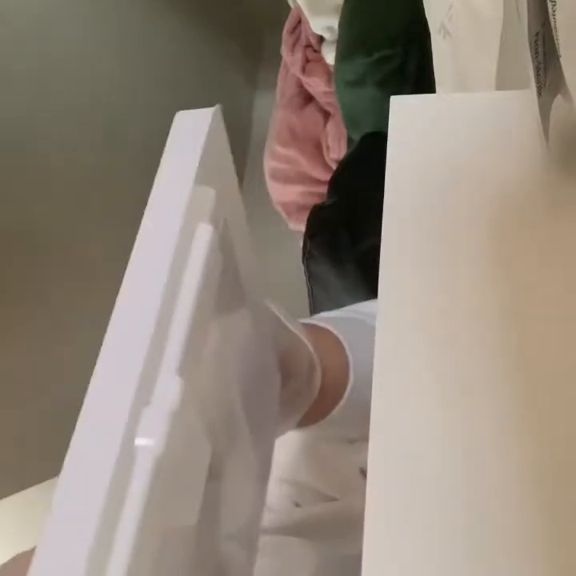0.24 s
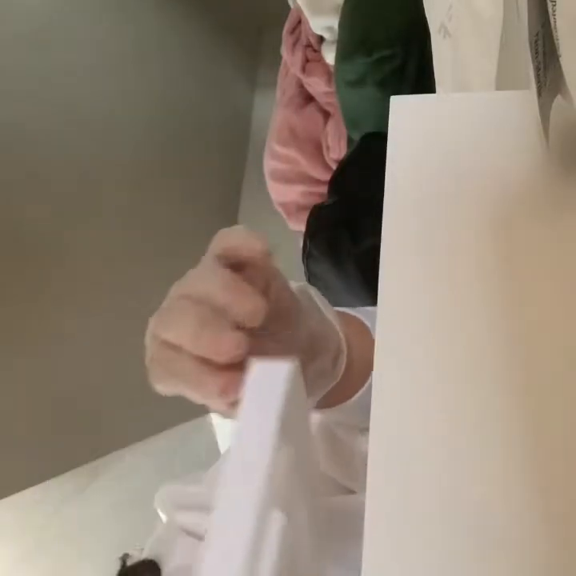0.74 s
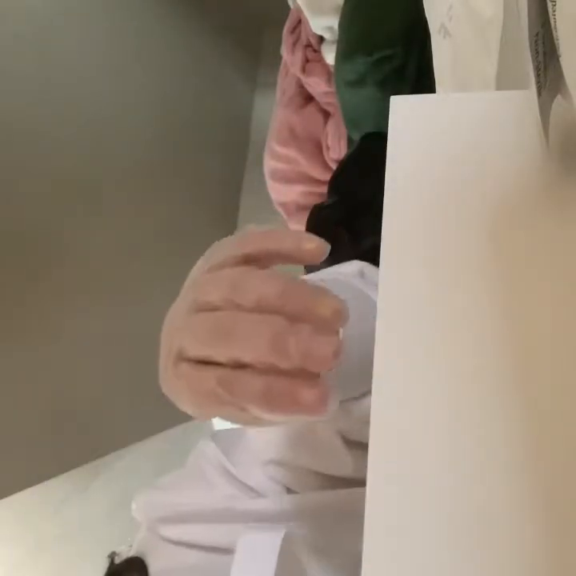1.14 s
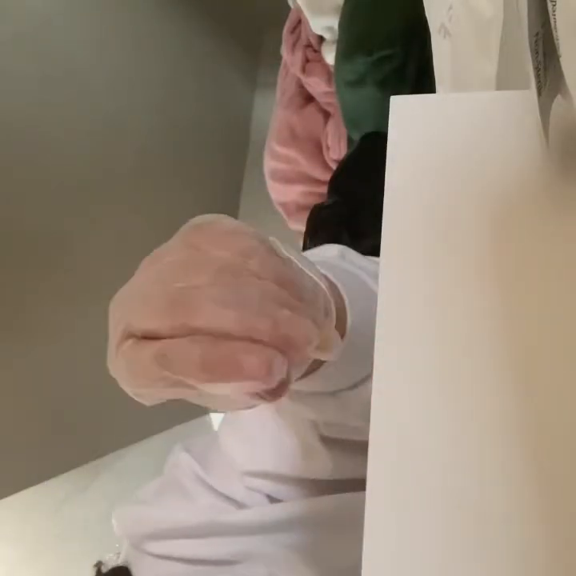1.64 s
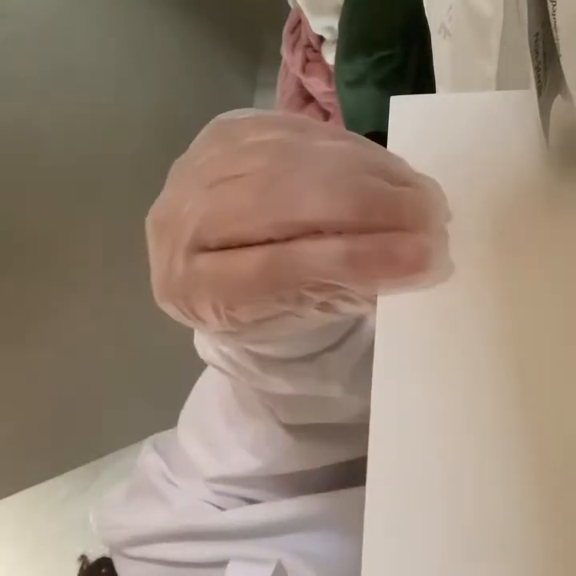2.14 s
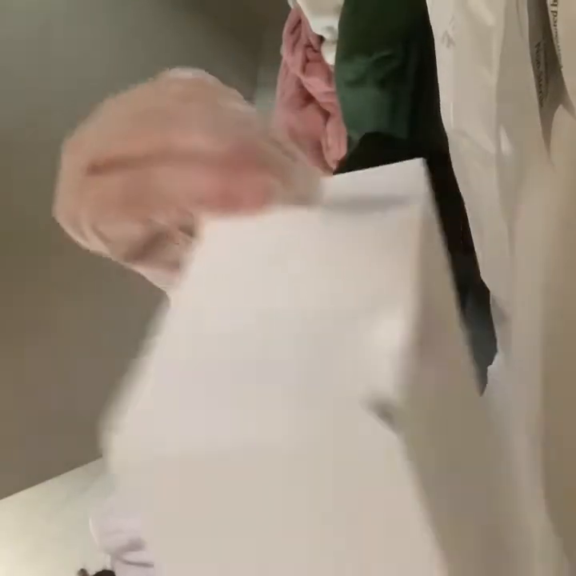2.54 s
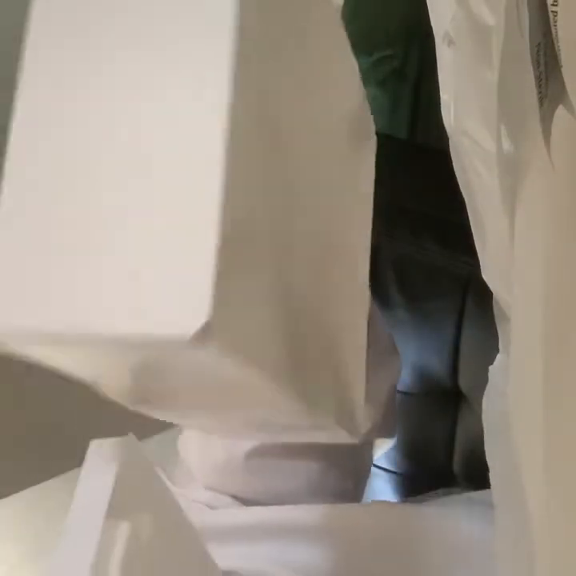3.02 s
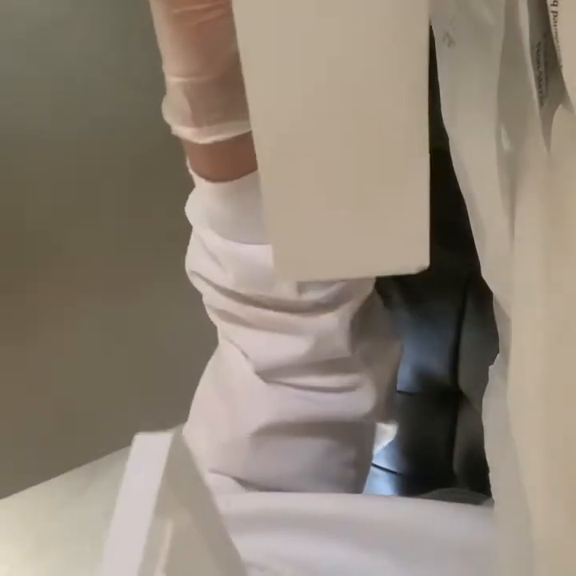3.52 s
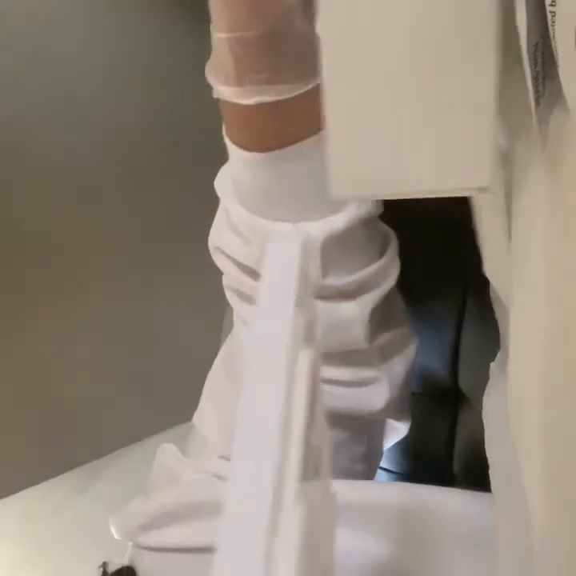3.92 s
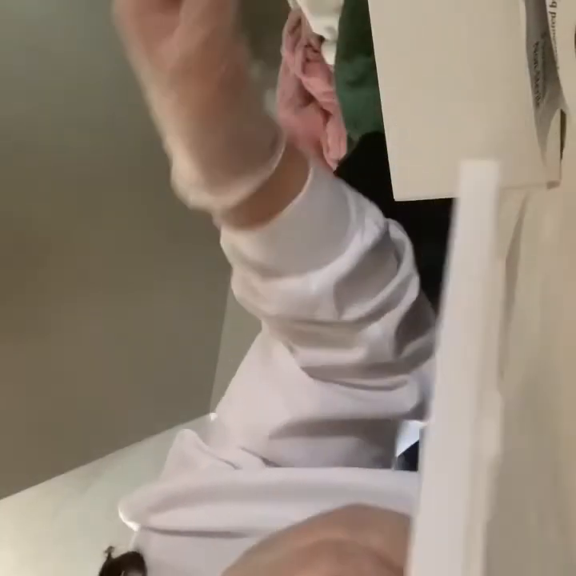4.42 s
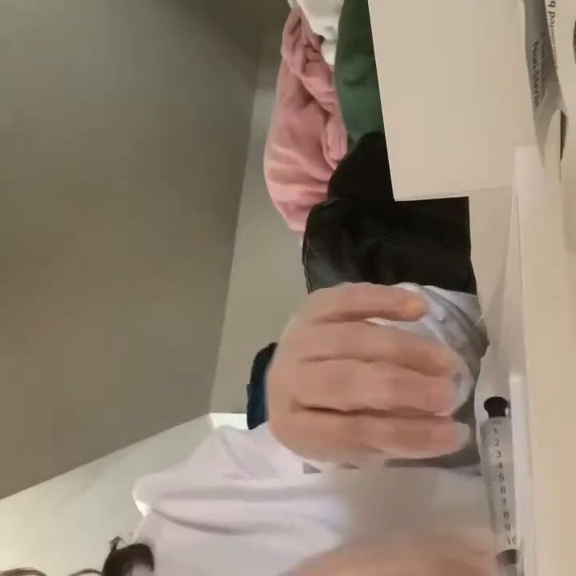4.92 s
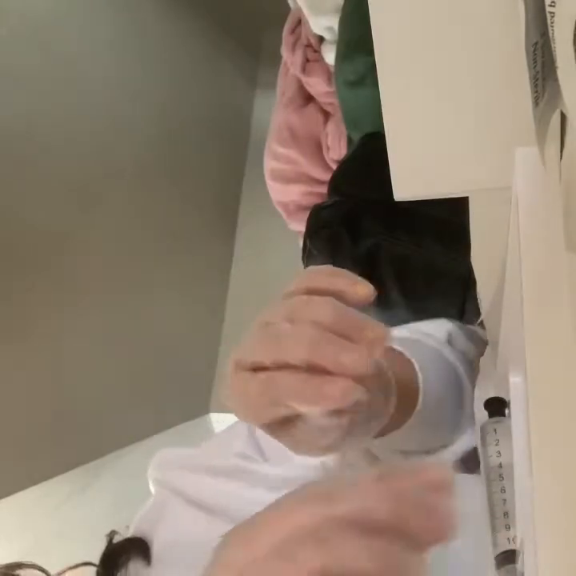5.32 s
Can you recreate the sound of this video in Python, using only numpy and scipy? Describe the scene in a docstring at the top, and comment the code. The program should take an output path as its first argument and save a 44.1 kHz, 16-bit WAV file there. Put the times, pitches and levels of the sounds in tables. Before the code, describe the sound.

Close by in a small room, card rasps along plastic and pops loose, then the tray is set down with clicks above ventilation hum.

```python
"""One hears a cardboard box pulled off a thin plastic tray, close by in a small room, over a steady ventilation hum.
Stick-slip friction drags, catches and slips the card along the tray's rim, ringing box and tray until a click.
Sleeve and glove stroke the tray by dense micro-slips; soft pushes ring the box's panel modes.
Short contact bursts make the clicks of the tray being set down; the fan is wavering tones over filtered noise."""
import sys
import numpy as np
from scipy import signal
from scipy.fft import rfft, irfft, next_fast_len
from scipy.io import wavfile

SR = 44100
rng = np.random.default_rng(int(sys.argv[2]) if len(sys.argv) > 2 else 0)


def master_out(mix):
    """Clip the mix to full scale and print it as 16-bit PCM to the path in sys.argv[1]."""
    frames = np.transpose(np.atleast_2d(mix))
    ceiling = np.clip(frames, -1, 1)
    pcm = np.round(ceiling * 32767).astype(np.int16)
    wavfile.write(sys.argv[1], SR, pcm)


N = 245469
TIME = np.arange(N) / SR
SIZE = next_fast_len(N)
HZ = np.maximum(np.arange(SIZE // 2 + 1) * SR / SIZE, 1)


def undb(db):
    """Level to amplitude: 20 dB is a factor of ten."""
    return 10 ** (np.asarray(db) / 20)


def unit(x):
    """Normalization to an rms of 1."""
    return x / np.sqrt(np.mean(x ** 2))


def over_hz(points):
    """Interpolation of (Hz, value) points on a logarithmic frequency axis."""
    hz, value = np.transpose(points)
    return np.interp(np.log(HZ), np.log(hz), value)


def response(points, peaks=()):
    """Minimum-phase filter of unit power: a smooth spectrum in dB, lifted by resonances."""
    db = over_hz(points)
    for hz, width, lift in peaks:
        db = db + lift / (1 + (2 * (HZ - hz) / width) ** 2)
    # folding the cepstrum onto positive times makes the filter causal
    cepstrum = irfft(np.log(unit(undb(db))), SIZE)
    cepstrum[1:SIZE // 2] *= 2
    cepstrum[SIZE // 2 + 1:] = 0
    return np.exp(rfft(cepstrum))


def through(x, filt):
    """Linear filtering: the spectrum is multiplied by a frequency response."""
    return irfft(rfft(x, SIZE) * filt, SIZE)[..., :N]


def decay_60db(age, t60):
    """Exponential decay: the amplitude falls by 60 dB in t60 seconds."""
    return np.exp(-np.log(1000) * age / t60)


def walk(rate):
    """Low-passed noise: a smooth random wander of rms 1, slower for a lower rate in Hz."""
    return unit(through(rng.standard_normal(N), np.exp(-(HZ / rate) ** 2) + 1e-12))


def friction(rate, spread_db):
    """Dry friction as a random train of micro-slips of unequal size, rms 1; rate in slips per second."""
    caught = rng.random(N) < rate / SR
    sign = rng.choice([-1, 1], N)
    size = undb(spread_db * np.minimum(rng.exponential(size=N), 4))
    return unit(caught * sign * size)


def swell(start, rise, hold, fall):
    """Contact envelope: linear build-up, steady hold, exponential decay; all in seconds."""
    level = np.zeros(N)
    span = slice(int(start * SR), int((start + rise + hold + 20 * fall) * SR))
    age = TIME[span] - start
    build_up = np.clip(age / max(rise, 1e-4), 0, 1)
    level[span] = build_up * np.exp(-np.maximum(age - rise - hold, 0) / max(fall, 1e-4))
    return level


# every contact builds up over a share of its length and dies away over another
RISE_SHARE, FADE_SHARE = 0.49, 0.71


def contact(start, length):
    """Contact time sets abruptness: the longer a touch lasts, the softer it starts and ends."""
    return swell(start, RISE_SHARE * length, (1 - RISE_SHARE) * length, FADE_SHARE * length)


# Level balance of the microphone ports. Each row: frequency in Hz, left minus right in dB.
PORT_BALANCE = [(60, -0.7), (200, -0.8), (400, -2.8), (700, -6), (1300, -6.5), (2400, 1.2), (4000, 0)]
# Diffuse share at the ports. Each row: frequency in Hz, diffuse sound relative to direct in dB.
DIFFUSE_SHARE = [(60, -26), (300, -18), (600, -9), (1200, -6), (2200, -3), (3300, -6), (4500, -24),
                 (5500, -10), (15000, -9)]
# Phase between the ports. Each row: frequency in Hz, lead of the left port in radians.
PORT_LEAD = [(0, 0), (600, -0.5), (1210, 0.3), (2410, -3.3), (2760, -3.0), (5000, -3.2), (7670, -6.1),
             (9560, -6.4), (10200, -7.4), (12000, -9.3), (14200, -9.6), (15000, -11.5), (15200, -11.6),
             (16000, -12.6)]


def ports(direct, diffuse):
    """Interaural-like phase and shading: treble reaches the left port later, the recorder's body shades the middle."""
    spread = undb(over_hz(DIFFUSE_SHARE))
    shade = undb(over_hz(PORT_BALANCE))
    delay = np.exp(1j * np.interp(HZ, *np.transpose(PORT_LEAD)))
    power = (1 + spread ** 2) * (1 + shade ** 2) / 2
    pair = np.array([shade * delay, np.ones_like(HZ)]) / np.sqrt(power)
    opposed = np.array([[1], [-1]])  # the diffuse part has opposite sign at the two ports
    return through(direct, pair) + through(diffuse, pair * spread * opposed)


def reflections(x, t60, dull_hz):
    """Reverberation: a dense echo train from the walls decays exponentially, its treble dulled."""
    tail = rng.standard_normal(N) * decay_60db(TIME, t60) * (TIME > .003)
    return through(x, rfft(tail / np.sqrt(np.sum(tail ** 2)), SIZE) / (1 + 1j * HZ / dull_hz))


# Tones of the fan. Each row: pitch in Hz, mean level in dB, waver as an rms share of the pitch.
FAN_TONES = [(59.5, -59, 0.0031), (212.8, -53, 0.00586), (322.3, -52.5, 0.01026), (402.6, -45.5, .0007),
             (601, -58, 0.00615), (806, -53.5, 0.00208)]
# Spectrum of the air in the duct. Each row: frequency in Hz, relative density in dB per Hz.
DUCT_AIR = [(25, -15), (42, -13), (60, 2), (150, 1.5), (450, 0), (700, 0), (950, -1), (1400, -8),
            (2200, -16), (3200, -18), (5500, -23), (8000, -29.5), (10000, -42), (15000, -56)]
# Resonances and dips of the duct. Each row: frequency in Hz, width in Hz, lift in dB.
DUCT_RESONANCES = [(120, 14.4, 4), (153, 17, -8.5), (193.3, 14, 11.5), (245, 64, -5), (317.4, 81, 10.5),
                   (337.6, 7.5, 3), (368, 16.7, -7), (423, 9.2, -5), (442.5, 17, 4), (476, 15.4, -4.5),
                   (526.6, 8.2, -6.5), (544, 16, 4), (601, 61, 6.5), (652, 58, -9), (1530, 52, -8)]


def ventilation(air_db=-41.0, flutter_db=1.0):
    """Rotating-fan tones, wavering in pitch and level, over turbulent noise shaped by duct resonances."""
    duct = response(DUCT_AIR, DUCT_RESONANCES)
    air, scattered = (undb(air_db) * through(rng.standard_normal(N), duct) for _ in range(2))
    hum = 0
    for hz, db, waver in FAN_TONES:
        phase = 2 * np.pi * np.cumsum(hz * (1 + waver * walk(3.84))) / SR
        hum = hum + undb(db + flutter_db * walk(4.7)) * np.sqrt(2) * np.sin(phase)
    return ports(air + hum, scattered)


# Dull bumps on the box. Each row: start in seconds, level of the push in dB, contact time in seconds.
BOX_BUMPS = [(2.566, -29, 0.0028), (2.851, -17, 0.019), (4.0009, -19.5, 0.0015), (4.095, -21, 0.0059),
             (4.725, -21.5, 0.0053)]
# Panel modes of the box. Each row: frequency in Hz, relative level in dB, time to decay by 60 dB in seconds.
PANEL_MODES = [(85.4, -28, 0.42), (156, -9.5, 0.14), (257, 4.5, 0.11), (375, 0.5, 0.043), (580, -6, 0.11)]


def bumps():
    """Modal excitation of the box's panels by soft pushes; a longer contact leaves only the lowest modes."""
    push = np.zeros(N)
    for s, db, length in BOX_BUMPS:
        pulse = np.sin(np.pi * np.clip((TIME - s) / length, 0, 1))
        push -= undb(db) * pulse / pulse.sum()
    ring = 0
    for hz, db, t60 in PANEL_MODES:
        ring = ring + undb(db) * np.sin(2 * np.pi * hz * TIME) * decay_60db(TIME, t60)
    radiation = (1j * HZ / (55 + 1j * HZ)) ** 3  # a small panel radiates no deep bass
    return through(push, rfft(ring, SIZE) * radiation)


# Strokes of sleeve and glove. Each row: firmest moment, build-up and let-go in seconds, peak pressure in dB.
GLOVE_STROKES = [(1.50, 0.052, 0.26, -65.5), (2.385, 0.36, 0.12, -57), (3.991, 0.32, 0.1, -51),
                 (4.06, 0.042, 0.27, -51.5), (4.715, 0.2, 0.17, -51.5), (5.42, 0.4, 0.42, -70)]
STROKE_CURVE = 1.03  # above 1 the pressure peaks more sharply


def pressure():
    """Normal force: sleeve and glove bear on the plastic in strokes that build up and let go."""
    total = 0
    for s, build, release, db in GLOVE_STROKES:
        stroke = np.interp(TIME, [s - build, s, s + release], [0, 1, 0])
        total = total + undb(db) * stroke ** STROKE_CURVE
    return total + 1e-6


# Spectrum of the lower cloth rustle. Each row: frequency in Hz, relative density in dB per Hz.
CLOTH_RUSTLE = [(200, -26), (700, 1), (1400, 6.5), (2000, 3), (3000, 4.5), (5000, -7), (8000, -9),
                (11000, -5), (16000, -22)]
# Spectrum of bright crinkling, also for the ticks. Each row: frequency in Hz, relative density in dB per Hz.
BRIGHT_CRINKLE = [(800, -3), (2000, 18), (3500, -10), (5000, 11), (9000, 8), (13000, -8), (16000, 3.5)]


def brushing(rustle_db=7.0, whisper_db=6.5, light_db=-60, uneven_db=3.5):
    """Fibre friction depends on load: a light touch only whispers, a firmer one adds the lower rustle."""
    touch = pressure()
    firm = 1 / (1 + (undb(light_db) / touch) ** 2)
    fibres = touch * undb(uneven_db * walk(35))
    rustle = friction(rate=1100, spread_db=1.5) * fibres * np.sqrt(firm)
    whisper = friction(rate=6000, spread_db=0.5) * fibres * np.sqrt(1 - firm)
    rustle = through(rustle, response(CLOTH_RUSTLE))
    whisper = through(whisper, response(BRIGHT_CRINKLE))
    return undb(rustle_db) * rustle + undb(whisper_db) * whisper


# Sharpest crinkles of glove and tray. Each row: start in seconds, level in dB, decay constant in seconds.
SHARP_TICKS = [(2.1315, -38.5, .0007), (2.157, -45, .0003), (2.1657, -38, .0005), (2.18, -48, .0006),
               (2.225, -39, 0.00065), (2.243, -39, .0005), (2.358, -46, .0006), (3.7041, -42, .0006),
               (3.7692, -41, .0006), (3.826, -47, .0006), (3.884, -37.5, 0.0033), (3.9054, -35.5, .002),
               (3.92, -34, 0.0013), (3.9356, -39, .0025), (3.993, -32.5, .003), (4, -38, 0.0018),
               (5.323, -41, 0.00057), (5.458, -41, 0.00066)]


def ticks(stray_rate=90, stray_db=-3):
    """Impulsive noise: a few sharp bright crinkles, and sparse stray ones that grow with the pressure."""
    force = sum(undb(db) * swell(s, .0003, 0, decay) for s, db, decay in SHARP_TICKS)
    stray = undb(stray_db) * pressure() * friction(rate=stray_rate, spread_db=0.5)
    return through(rng.standard_normal(N) * force + stray, response(BRIGHT_CRINKLE))


# stick-slip unsteadiness: scatter of its pitch (share) and level (dB), ring-out (s)
CHATTER_SCATTER, CHATTER_DB, CHATTER_RING_S = 0.05, 3, 0.0083


def chatter(rows):
    """Stick-slip locked to a resonance, for rows of (s, length s, Hz, dB): rough, then ringing out."""
    clock = np.cumsum(1 + CHATTER_SCATTER * walk(257)) / SR  # one unsteady time base for all pitches
    rough = unit(undb(CHATTER_DB * walk(270)))
    tones = 0
    for s, length, hz, db in rows:
        grip = swell(s, RISE_SHARE * length, (1 - RISE_SHARE) * length, CHATTER_RING_S)
        tones = tones + undb(db) * grip * np.sin(2 * np.pi * hz * clock)
    return np.sqrt(2) * rough * tones


# Short scuffs of glove and card on the plastic.
# Each row: start in seconds, length in seconds, mean pitch in Hz, level in dB.
PLASTIC_SCUFFS = [(2.376, 0.005, 1860, -45), (2.402, 0.01, 1680, -43.5), (3.881, 0.006, 1236, -46),
                  (3.918, 0.005, 2020, -55), (3.934, 0.006, 2110, -45), (3.954, 0.012, 1750, -47),
                  (3.979, 0.005, 2910, -47), (3.991, 0.012, 1407, -40), (4.031, 0.0076, 1810, -39),
                  (4.046, 0.0085, 1706, -37), (4.091, 0.0055, 1476, -40)]


def scuffs():
    """Brief stick-slip: glove and card chatter on the plastic."""
    return chatter(PLASTIC_SCUFFS)


# Resonances of the hollow box. Each row: frequency in Hz, width in Hz, relative level in dB.
BOX_RESONANCES = [(76, 20, -3.5), (448, 57, -6), (550, 60, -3.5), (757, 29, 1.5), (940, 86, -2),
                  (1165, 30, 3), (1240, 170, -8.5), (1456, 25, -0.5), (1690, 68, -7), (1927, 46, -9),
                  (2030, 130, -14)]


def hollow(force):
    """Modal superposition: a force rings the box's resonances, alternating in sign, at unit power."""
    box = 0
    for k, (hz, width, db) in enumerate(BOX_RESONANCES):
        detuning = (HZ / hz - hz / HZ) * hz / width
        box = box + undb(db) / (1 + 1j * detuning) * (-1) ** k
    return through(force, box / np.sqrt(np.mean(abs(box) ** 2)))


# Modes of the tray's floor. Each row: frequency in Hz, relative level in dB, time to decay by 60 dB in seconds.
FLOOR_MODES = [(398, -1, 0.047), (964, 0, 0.15), (1098, 0.5, 0.026), (1492, -2.5, 0.036), (2170, -2, 0.023),
               (2480, -5.5, 0.051), (2780, -6.5, 0.082), (3090, -9.5, 0.072)]
EXCITED_OCTAVES = 0.86  # how far from the centre of excitation the modes still answer


def floor_ring(start, centre_hz):
    """Selective modal excitation: the place of the tap picks the modes of the tray's floor that answer."""
    out = np.zeros(N)
    span = slice(int(start * SR) + 1, int(start * SR) + SR // 4)
    age = TIME[span] - start
    for hz, db, t60 in FLOOR_MODES:
        share = np.exp(-(np.log2(hz / centre_hz) / EXCITED_OCTAVES) ** 2)
        tone = np.sin(2 * np.pi * (hz * age + rng.random()))
        out[span] += share * undb(db) * tone * decay_60db(age, t60)
    return out


# Resonances of the thin free tray, also for the scrape. Each row: frequency in Hz, width in Hz, lift in dB.
TRAY_FREE = [(2900, 40, 9), (3130, 90, 8), (3550, 60, 6), (3720, 60, 4), (4100, 50, 4), (4700, 110, 6),
             (5240, 130, 9), (5640, 60, 4), (6290, 100, 10), (6780, 170, 8), (7180, 120, 7), (7620, 90, 6),
             (8010, 160, 9), (8590, 80, 7), (9280, 90, 7), (9960, 90, 7), (11150, 110, 7), (11900, 150, 6)]
# Spectrum of the snapping plastic. Each row: frequency in Hz, relative density in dB per Hz.
SNAP_SPECTRUM = [(150, 3.5), (500, 5.5), (1000, 3), (1600, 3), (2300, 1), (3300, 1.5), (4200, 4),
                 (8000, -3), (11500, -2), (16000, -14)]
# Plastic clicks and taps. Each row: start in seconds, length in seconds, tray level in dB, box body level in dB,
# ring of the tray's floor in dB, frequency in Hz around which the floor is excited most.
PLASTIC_CLICKS = [(2.8319, 0.0044, -28.5, -33.5, -27.5, 430), (2.834, 0.0013, -40, -46, -29, 2800),
                  (4.032, 0.0015, -31.5, -42, -44, 1700), (4.038, 0.0026, -38, -53, -50, 1700),
                  (4.0464, 0.0015, -39, -35, -40, 1400), (4.0517, 0.00334, -40, -43, -38, 1600),
                  (4.089, 0.011, -33.5, -45, -46, 1800), (4.7242, 0.00404, -32.5, -44, -30, 2320),
                  (4.753, 0.00805, -37, -40, -29.5, 1700), (4.766, 0.0016, -57, -38, -41, 1200)]
# a snapping edge is pinched, and keeps only this share of the tray's resonant lift
CLICK_RING = 0.55
RATTLE_DB, RATTLE_S = -10, 0.011  # the plastic rattles on after a click: level re the burst, decay constant


def clicks():
    """Impact excitation: plastic snaps over an edge in a burst of contacts that rings tray, floor and box."""
    snap = knock = ring = 0
    for s, length, tray_db, box_db, ring_db, centre_hz in PLASTIC_CLICKS:
        rattle = undb(RATTLE_DB) * swell(s, length, 0, RATTLE_S)
        burst = np.maximum(contact(s, length), rattle)
        snap = snap + undb(tray_db) * burst
        knock = knock + undb(box_db) * burst
        ring = ring + undb(ring_db) * floor_ring(s + RISE_SHARE * length, centre_hz)
    contacts = friction(rate=19000, spread_db=1.0)
    pinched = [(hz, width, CLICK_RING * lift) for hz, width, lift in TRAY_FREE]
    return through(contacts * snap, response(SNAP_SPECTRUM, pinched)) + hollow(contacts * knock) + ring


# the card skips over the rim in quick uneven jerks: mean log rate as Hz, scatter of the rate (share),
# decay of a jerk (share of a cycle), drag left between jerks (a jerk's peak adds 1)
SKIP_HZ, SKIP_SCATTER, SKIP_DECAY, SKIP_REST = 420, 0.35, 0.3, 0.35


def skipping():
    """Relaxation oscillation: each stick-slip jerk starts sharply and dies away before the next; rms 1."""
    cycle = np.cumsum(SKIP_HZ * np.exp(SKIP_SCATTER * walk(200))) / SR % 1
    return unit(SKIP_REST + np.exp(-cycle / SKIP_DECAY))


# Card catching (box loud) or slipping free (rim loud); each grip makes the card chatter at its own pitch.
# Each row: start in seconds, length in seconds, box body level in dB, rim hiss level in dB,
# mean ring pitch in Hz, ring level in dB.
CARD_SLIPS = [(2.546, 0.0037, -27.5, -44, 900, -29.5), (2.553, 0.01, -38, -35.5, 2700, -39.5),
              (2.561, 0.0075, -28, -40, 555, -30.5), (2.565, 0.016, -29.5, -34.5, 1170, -36.5),
              (2.638, 0.0068, -27, -44, 1090, -35), (2.648, 0.01, -29.5, -40, 915, -26.5),
              (2.660, 0.007, -31, -29, 1610, -38), (2.673, 0.011, -34.5, -30.5, 2000, -40),
              (2.702, 0.021, -38, -26.5, 1390, -34), (2.724, 0.019, -45, -26.5, 2910, -40),
              (2.739, 0.019, -46, -39, 1430, -31.5), (2.76, 0.010, -48, -43, 2190, -44),
              (2.789, 0.005, -43, -53, 2600, -47)]
# Spectrum of the rasp on the rim. Each row: frequency in Hz, relative density in dB per Hz.
RIM_RASP = [(300, -19), (1200, 3), (2600, 1.5), (3400, 0), (4100, 3), (6000, -0.5), (8600, -1.5),
            (10000, -6.5), (13000, -9), (16000, -10)]
# Resonances of the tray while the box still grips it. Each row: frequency in Hz, width in Hz, lift in dB.
TRAY_HELD = [(2000, 60, 7), (2750, 200, 7), (3300, 200, 4), (4550, 140, 5), (5250, 150, 8), (6700, 90, 5),
             (7300, 200, 11), (7750, 70, 12), (8350, 90, 11), (8620, 90, 8), (9550, 80, 6)]
# the card drags along the rim for the whole pull
PULL_S, PULL_LENGTH_S, PULL_RISE_S, PULL_FADE_S = 2.547, 0.24, 0.0046, 0.015
PULL_BOX_DB, PULL_RIM_DB = -38, -41
# the card stalls for a moment, then the tray comes free of the box's grip
STALL_S, STALL_LENGTH_S, STALL_DB = 2.699, 0.0052, -5.5


def scrape(judder_db=1.36):
    """Stick-slip friction: drag and showers of catches ring the box and rasp on the rim, whose ring changes once free."""
    drag = swell(PULL_S, PULL_RISE_S, PULL_LENGTH_S, PULL_FADE_S)
    # drag and slips add as powers
    body = (undb(PULL_BOX_DB) * drag) ** 2
    hiss = (undb(PULL_RIM_DB) * drag) ** 2
    for s, length, box_db, rim_db, _, _ in CARD_SLIPS:
        power = contact(s, length) ** 2
        body = body + undb(box_db) ** 2 * power
        hiss = hiss + undb(rim_db) ** 2 * power
    judder = undb(judder_db * walk(195)) * skipping()
    card = hollow(friction(rate=2600, spread_db=1.0) * np.sqrt(body) * judder)
    stall = undb(STALL_DB * np.exp(-((TIME - STALL_S) / STALL_LENGTH_S) ** 2))
    rasp = friction(rate=11000, spread_db=0.0) * np.sqrt(hiss) * judder * stall
    free = TIME > STALL_S
    held_rim = through(rasp * ~free, response(RIM_RASP, TRAY_HELD))
    free_rim = through(rasp * free, response(RIM_RASP, TRAY_FREE))
    grips = chatter([(s, length, hz, db) for s, length, _, _, hz, db in CARD_SLIPS])
    return card + held_rim + free_rim + grips


def handling(room_db=-16):
    """Direct and reverberant sound: rubbing and clicking close by, with a short tail from the walls."""
    near = scrape() + clicks() + scuffs() + ticks() + brushing()
    return near + undb(room_db) * reflections(near, t60=0.37, dull_hz=5000)


def scene(bump_pan_db=-3.5):
    """Extended sources: far parts of box and tray reach the ports as a diffuse share; bumps come from the right."""
    knocks = bumps() * undb(np.array([[bump_pan_db], [-bump_pan_db]]) / 2)
    return ports(handling(), handling()) + knocks + ventilation()


def record(dry):
    """Band limiting: the recorder's steep elliptic low-pass cuts the top above 15.8 kHz."""
    return signal.sosfilt(signal.ellip(10, .1, 80, 15800, fs=SR, output="sos"), dry)


dry = scene()
out = record(dry)
master_out(out)
```